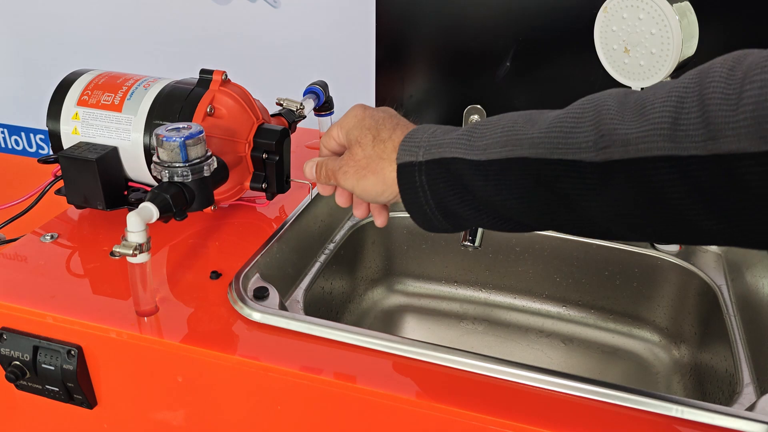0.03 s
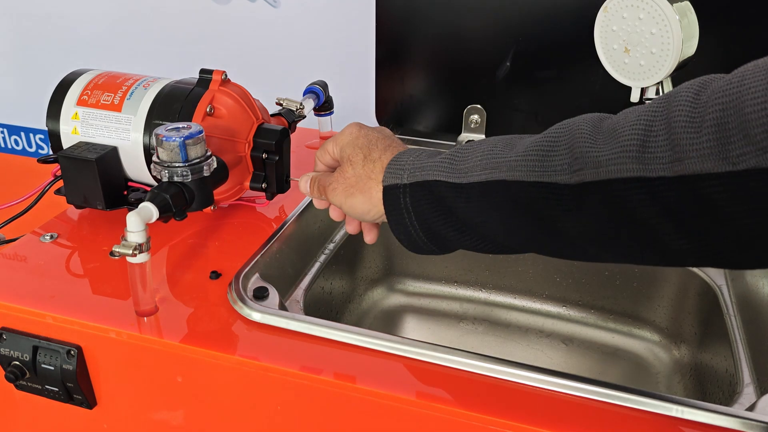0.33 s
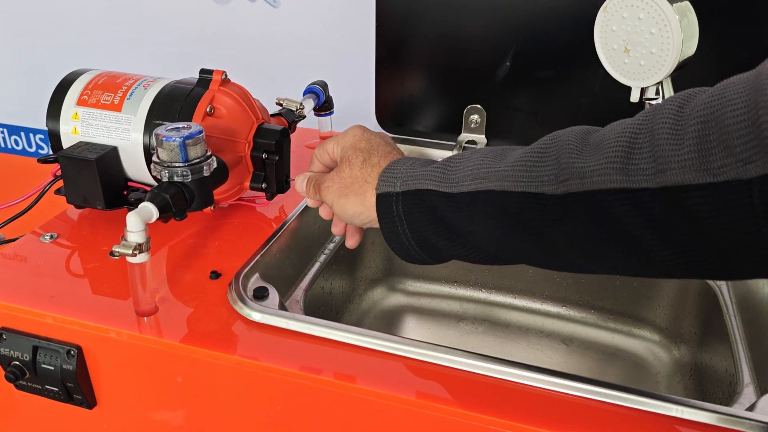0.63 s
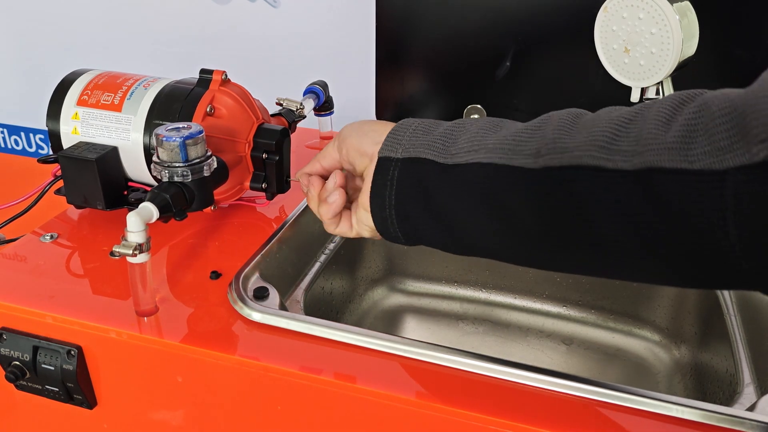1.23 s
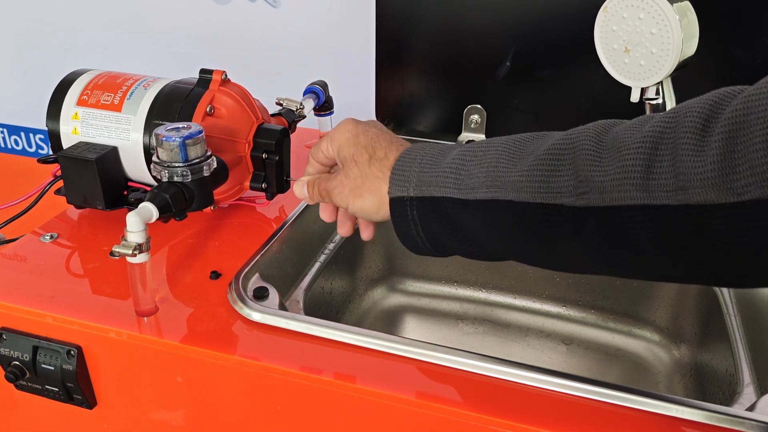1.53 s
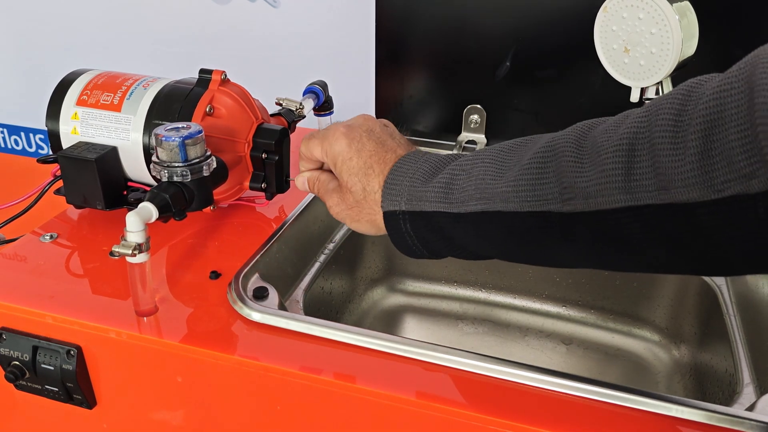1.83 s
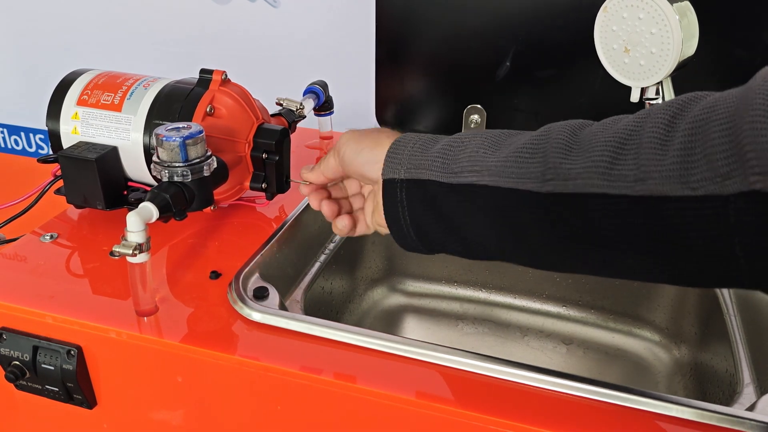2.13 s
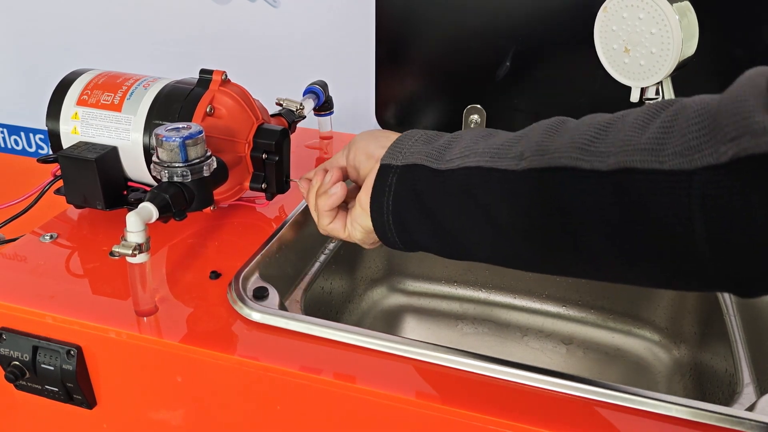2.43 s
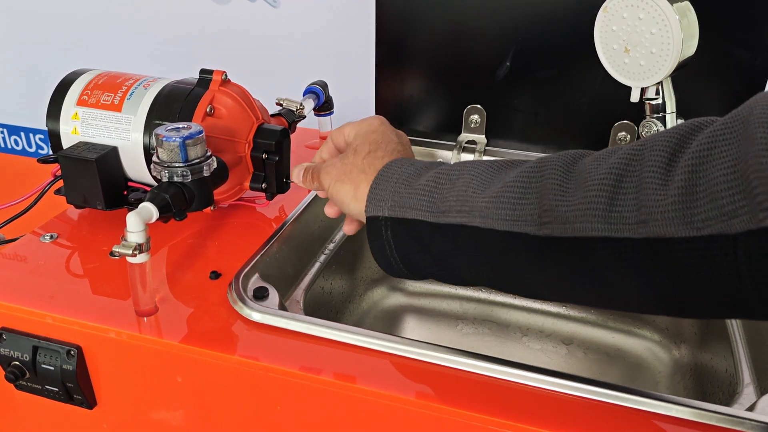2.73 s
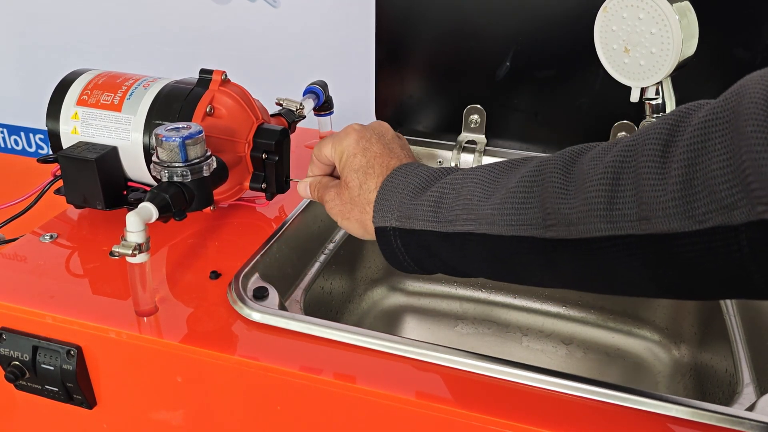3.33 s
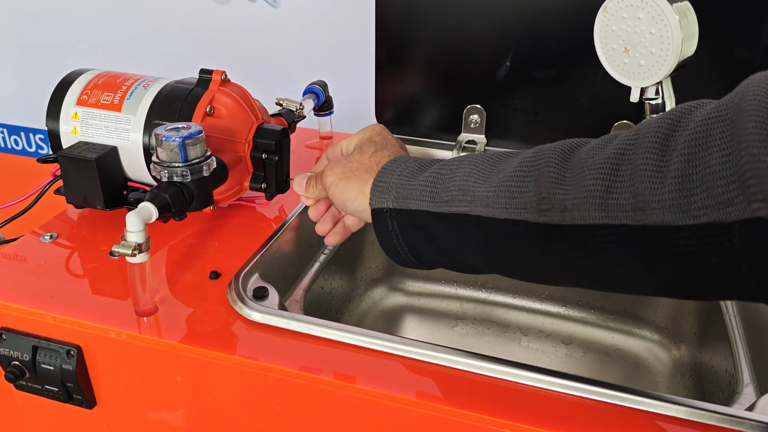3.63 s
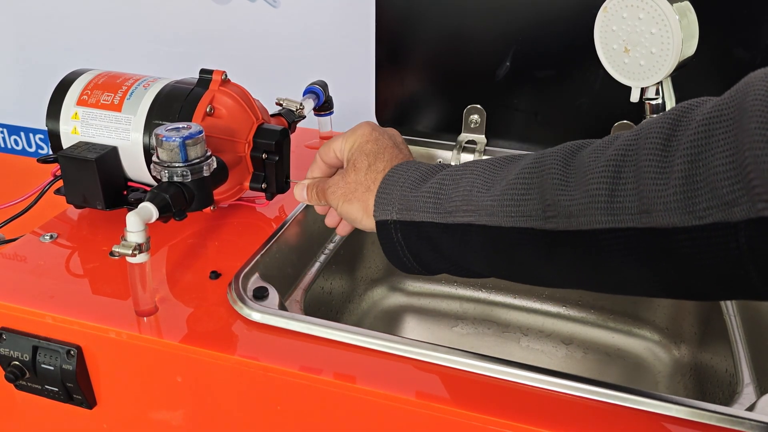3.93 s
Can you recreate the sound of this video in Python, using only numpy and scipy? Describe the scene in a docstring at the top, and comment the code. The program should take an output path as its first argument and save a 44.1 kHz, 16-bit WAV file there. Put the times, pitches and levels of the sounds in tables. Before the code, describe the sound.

An electric water pump drones close up beside a steel sink, with a throbbing whine, a rasp and hissing water. A few faint tool clicks sound, and past the middle the motor slows slightly and changes tone.

```python
"""An electric diaphragm pump drones on a counter beside a steel sink, heard close up in stereo.
Its cycle repeats every five motor turns: the housing hums, and a whine and a rasp throb once a cycle.
Water hisses in the fittings and makes two small blips, while the counter rumbles underneath.
A tool clicks on the adjusting screw. Past the middle the motor slows a little and the hum changes tone."""
import sys
import numpy as np
from scipy import signal
from scipy.fft import rfft, irfft
from scipy.io import wavfile
from scipy.ndimage import uniform_filter1d

SR = 44100
rng = np.random.default_rng(int(sys.argv[2]) if len(sys.argv) > 2 else 0)


def transcribe(u):
    """Save the signal u as a 16-bit wav file named by the first command-line argument.

    u: samples, shape (n,) or (channels, n), limited to [-1, 1]; the rate is SR.
    q: integer samples, one column per channel.
    """
    v = np.clip(np.atleast_2d(u).T, -1, 1)
    q = np.round(v * 32767).astype(np.int16)
    wavfile.write(sys.argv[1], SR, q)


N = 176400

# How fast the motor spins. Each row: time in seconds, turns per second.
MOTOR_SPEED = [(0.0, 72.38), (0.2, 72.88), (0.45, 72.55), (0.7, 72.73), (0.95, 72.64), (1.2, 73.43),
               (1.45, 72.82), (1.7, 72.93), (1.95, 72.73), (2.2, 72.87), (2.4, 71.46), (2.6, 70.66),
               (2.8, 69.69), (3.05, 69.97), (3.3, 69.52), (3.55, 69.81), (3.8, 68.95), (4.0, 69.0)]
# The motor's low tone. Each row: time in seconds, level in dB.
DRONE_LEVELS = [(0, -37.5), (1.2, -39.5), (1.4, -37.5), (2.55, -36.5), (2.85, -43), (3.7, -44), (4, -53)]
# Three changes of tone as the motor slows. Each row: start in seconds, end in seconds.
TONE_CHANGES = [(2.15, 2.35), (2.6, 2.85), (3.5, 3.75)]
# The housing's hum. Each row: vibrations per pump cycle, level in dB at full speed,
# then the level in dB after each of the three changes.
HUM_TONES = [(7, -67, -73, -59, -58), (8, -53, -66, -64, -71), (9, -55, -54, -61, -52),
             (11, -53, -59, -57, -53), (12, -50, -47, -49, -49), (13, -52, -46, -55, -52),
             (14, -60, -50, -49, -42), (15, -51, -47, -46, -48), (16, -49, -54, -58, -56),
             (17, -59, -62, -59, -72), (18, -57, -49, -50, -48), (19, -49, -48, -62, -56),
             (20, -47, -50, -49, -49), (21, -52, -55, -52, -51), (22, -56, -60, -53, -59),
             (23, -68, -66, -57, -57), (24, -51, -61, -70, -58), (25, -45, -45, -48, -53),
             (26, -55, -54, -52, -53), (27, -60, -50, -48, -48), (28, -56, -63, -57, -57),
             (29, -61, -57, -64, -74), (30, -64, -64, -64, -60), (31, -60, -59, -60, -61),
             (32, -62, -62, -62, -68), (33, -57, -61, -65, -66), (34, -62, -64, -70, -71),
             (35, -56, -53, -56, -63), (36, -63, -62, -61, -63), (37, -69, -59, -60, -57),
             (38, -61, -72, -62, -60), (43, -62, -69, -73, -65), (44, -58, -62, -58, -58),
             (45, -64, -56, -61, -70), (46, -54, -59, -53, -53), (47, -63, -61, -65, -63),
             (48, -61, -66, -65, -59), (49, -60, -59, -58, -56), (50, -63, -64, -64, -58),
             (51, -61, -59, -57, -59), (52, -68, -67, -65, -62), (60, -58, -62, -58, -58)]
# The motor's whine. Each row reads like a row of the hum.
WHINE_TONES = [(39, -52, -53, -54, -57), (40, -45.8, -54, -56, -52), (41, -47.5, -48, -47, -50),
               (42, -61, -61, -57, -59)]
# The pump head's rasp. Each row: pitch in Hz, width in Hz, level in dB, change in dB once slowed,
# place of the swell in the cycle from 0 to 1, swing in dB at full effort.
RASP_BANDS = [(880, 88, -55.5, -1, 0.23, 3.5), (1270, 310, -63, 2.5, 0.82, 11.5),
              (1820, 346, -56.5, -2.5, 0.64, 10), (2313, 170, -56, -3, 0.57, 8),
              (2686, 154, -52.5, -0.5, 0.8, 5.5)]
# The water's hiss. Each row: frequency in Hz, left and right strength in dB per Hz.
HISS_SPECTRUM = [(500, -100, -100), (1460, -82.5, -83.5), (2690, -78.5, -83), (3220, -68.5, -69.5),
                 (3470, -89, -71), (3790, -65.5, -70), (4320, -69, -73.5), (5230, -72, -74),
                 (6430, -76, -73), (7600, -80, -83.5), (8300, -81.5, -92), (10200, -75, -80),
                 (11280, -78.5, -102), (12100, -89, -86), (15100, -73.5, -78.5), (15400, -90, -87.5)]
# How the hiss rises and falls. Each row: time in seconds, dB added to it.
HISS_GAINS = [(0, -1.2), (.7, -0.5), (1.2, -0.96), (2.5, -1.8), (3.2, -1), (4, -2)]
# How alike the hiss is in both ears. Each row: frequency in Hz, likeness from 0 to 1.
HISS_LIKENESS = [(1400, 0.23), (3000, 0.79), (4800, 0.85), (6500, 0.15), (9000, 0.56), (15000, 0.4)]
# Where the fittings ring. Each row: pitch in Hz, width in Hz, gain in dB, left minus right in dB.
FITTING_BANDS = [(3020, 200, -10, 13.5), (4545, 320, 4.2, -5), (5090, 215, -1.8, -4.5), (6290, 440, -3, -7)]
# Those rings shift as the hand moves. Each row: time in seconds, then dB added to each ring in turn.
FITTING_GAINS = [(0, -58, -41, -57, -42), (0.22, -47, -47, -40.5, -48), (0.38, -51, -47, -44, -44.5),
                 (0.55, -64, -41.5, -54, -46), (0.8, -49, -38.5, -62, -44), (1.1, -68, -42.5, -59, -62),
                 (1.4, -76, -43, -50, -54), (1.65, -45, -41, -59, -47), (1.95, -42, -39.5, -43, -42),
                 (2.2, -48, -41, -47, -49), (2.45, -65, -43.5, -43, -56), (2.8, -62, -43, -43, -62),
                 (3.15, -40.5, -42.5, -39.5, -56), (3.4, -41.5, -42, -42.5, -49), (3.7, -46, -43, -42, -49),
                 (4, -42, -42.5, -42, -52)]
# The tool's clicks. Each row: start in seconds, gain in dB, left minus right in dB.
TOOL_CLICKS = [(.9754, -13.2, 5), (2.048, -21, 2), (3.5888, -16.3, 4), (3.5904, -23, 3)]
# The ring of tool and screw. Each row: pitch in Hz, relative level in dB, seconds to fade by 60 dB.
TOOL_RING = [(1550, -15.5, 0.0089), (2500, -16, 0.0088), (4500, -12, 0.016), (6620, -0.5, 0.0059),
             (7100, -1, 0.0044), (8450, -6.5, 0.0091), (9830, -6.5, 0.0048)]
# Small watery blips. Each row: start in seconds, pitch in Hz, level in dB.
WATER_BLIPS = [(1.605, 1050, -38), (3.325, 880, -35)]
# The rumble of motor and counter. Each row: frequency in Hz, strength in dB per Hz.
RUMBLE_SPECTRUM = [(15, -88), (55, -78.5), (75, -72.5), (95, -75.5), (120, -64), (150, -72.5), (200, -73),
                   (280, -71.5), (370, -75), (450, -77), (620, -79), (800, -77.5), (1100, -81.5),
                   (2000, -97)]

TURNS_PER_CYCLE = 5
DRONE_ORDER, WHINE_ORDER = 10, 40  # an order counts vibrations per pump cycle
SLOWING_MIDDLE_S, SLOWING_LENGTH_S = 2.6, 0.26
HUM_AT, HUM_SCATTER = 0.05026, 0.85  # where in the cycle the hum gathers, and how loosely (0 to 1)
HUM_WAVER_DB, HUM_SPREAD_HZ, PHASE_WAVER_RAD = 1.0, 1000, .09
WHINE_AT, WHINE_SLOW_AT = 0.65, 0.2  # where in the cycle the whine swells, before and after slowing
WHINE_BEND_RAD = 0.63  # keeps its tones a little out of step
HISS_FLICKER_DB, HISS_BAND_FLICKER_DB, FITTING_FLICKER_DB = 0.6, 1.7, 1.37
CRACK_DB, CRACK_FADE_S, CLICK_RISE_S = -24, 0.00071, .0002
BLIP_FADE_S, BLIP_RISE_S = 0.081, 0.0022
RUMBLE_SPREAD_HZ, RUMBLE_WAVER_DB = 670, 0.5
SHAKE_HZ, SHAKE_WIDTH_HZ, SHAKE_DB, SHAKE_SLOW_DB = 33, 28, -54.5, -61
RIGHT_DELAY_S, TREBLE_CUT_HZ = 0.00014, 15900


def motor_drone(cycle):
    """The motor makes a firm low tone that vibrates twice per turn."""
    level_db = curve(DRONE_LEVELS) + 0.46 * wander(6.5)
    return undb(level_db) * np.sin(2 * np.pi * DRONE_ORDER * (cycle - HUM_AT))


def housing_hum(cycle):
    """The housing hums at multiples of the cycle rate; higher tones differ more between the ears."""
    out = np.zeros((2, N))
    cycle_hz = cycle[-1] * SR / N
    for order, *levels_db in HUM_TONES:
        start = HUM_SCATTER * rng.uniform(-np.pi, np.pi)
        ear_shift = rng.choice([-1, 1]) * min(order * cycle_hz / HUM_SPREAD_HZ, 1) ** 2
        gain = undb(staged(levels_db) + HUM_WAVER_DB * wander(5.09))
        phase = 2 * np.pi * order * (cycle - HUM_AT) + start + PHASE_WAVER_RAD * wander(4.24)
        out += gain * np.sin(phase + np.array([[ear_shift], [-ear_shift]]))
    return out * pan(db=-1.9)


def motor_whine(cycle, slowed):
    """Close tones of the motor fall nearly into step once a cycle, so the whine swells."""
    swell_phase = 2 * np.pi * (cycle - WHINE_AT - (WHINE_SLOW_AT - WHINE_AT) * slowed)
    ear_shift = np.array([[.35], [-.35]])
    phase = 2 * np.pi * WHINE_ORDER * cycle + PHASE_WAVER_RAD * wander(7.7) + ear_shift
    out = 0
    for order, *levels_db in WHINE_TONES:
        step = order - WHINE_ORDER
        out += undb(staged(levels_db)) * np.sin(phase + step * swell_phase + WHINE_BEND_RAD * step ** 2)
    return out * pan(db=-2.5)


def pump_rasp(cycle, slowed):
    """The pump head rings with bands of noise, each swelling at its own place in the cycle."""
    effort = 0.8 + .22 * wander(14)  # no two cycles are alike
    out = 0
    for hz, width, db, change_db, at, swing_db in RASP_BANDS:
        throb_db = effort * swing_db * np.cos(2 * np.pi * (cycle - at))
        out += noise_band(hz, width, likeness=0.52) * undb(db + change_db * slowed + throb_db)
    return out


def water_hiss():
    """Water hisses through the pump; every band of the hiss flickers on its own."""
    colour = undb([by_hz(HISS_SPECTRUM, column=1), by_hz(HISS_SPECTRUM, column=2)])
    spectrum = stereo_spectra(by_hz(HISS_LIKENESS)) * colour
    band = np.minimum(np.fft.rfftfreq(N, 1 / SR) // 700, 23)  # 700 Hz each; the last takes the rest
    hiss = sum(irfft(spectrum * (band == k), N) * undb(HISS_BAND_FLICKER_DB * wander(90))
               for k in np.unique(band))
    return hiss * undb(curve(HISS_GAINS) + HISS_FLICKER_DB * wander(250))


def fittings():
    """Rushing water makes the fittings ring at a few high pitches."""
    gains = np.array(FITTING_GAINS, float)
    out = 0
    for column, (hz, width, db, pan_db) in enumerate(FITTING_BANDS, start=1):
        ring = noise_band(hz, width, likeness=0.83) * pan(pan_db)
        out += ring * undb(db + curve(gains[:, [0, column]]) + FITTING_FLICKER_DB * wander(39.78))
    return out


def tool_clicks():
    """The tool snaps against the screw: a tiny crack and a short metallic ring."""
    out = np.zeros((2, N))
    t = np.arange(SR // 20) / SR
    ring = sum(undb(db - 60 * t / fade_s) * np.sin(2 * np.pi * hz * t) for hz, db, fade_s in TOOL_RING)
    rise = 1 - np.exp(-t / CLICK_RISE_S)
    treble = signal.butter(4, [3500, 10500], "band", fs=SR, output="sos")
    for at, db, pan_db in TOOL_CLICKS:
        crack = signal.sosfilt(treble, rng.standard_normal((2, len(t))) * np.exp(-t / CRACK_FADE_S))
        i = int(at * SR)
        out[:, i:i + len(t)] += undb(db) * pan(pan_db) * (ring + undb(CRACK_DB) * crack) * rise
    return out


def water_blips():
    """Short bubble-like tones sound in the water and die away."""
    out = np.zeros(N)
    for at, hz, db in WATER_BLIPS:
        t = np.maximum(np.arange(N) / SR - at, 0)
        rise = 1 - np.exp(-t / BLIP_RISE_S)
        out += undb(db - 60 * t / BLIP_FADE_S) * rise * np.sin(2 * np.pi * hz * t)
    return out


def counter_rumble():
    """Motor and counter rumble unevenly; the lowest part is nearly the same in both ears."""
    colour = undb(by_hz(RUMBLE_SPECTRUM))
    spread = np.clip(np.fft.rfftfreq(N, 1 / SR) / RUMBLE_SPREAD_HZ, .33, .9) ** 2
    middle = irfft(white_spectrum() * colour, N)
    side = irfft(white_spectrum() * colour * spread, N)
    return (middle + side * np.array([[1], [-1]])) * undb(RUMBLE_WAVER_DB * wander(24.8))


def counter_shake(slowed):
    """The counter shakes deeply under the pump, less once the motor slows."""
    level_db = SHAKE_DB + (SHAKE_SLOW_DB - SHAKE_DB) * slowed
    return noise_band(SHAKE_HZ, SHAKE_WIDTH_HZ, likeness=0.91) * undb(level_db)


def undb(db):
    """Turn decibels into a number to multiply by."""
    return 10 ** (np.asarray(db) / 20)


def pan(db):
    """Left and right gains, with the left `db` decibels above the right."""
    return undb(np.array([[db], [-db]]) / 2)


def curve(table):
    """Join rows of time and value with straight lines."""
    return np.interp(np.arange(N) / SR, *np.array(table, float).T)


def staged(levels_db):
    """A level that holds still, then glides to the next at each change of tone."""
    return np.interp(np.arange(N) / SR, np.ravel(TONE_CHANGES), np.repeat(levels_db, 2)[1:-1])


def by_hz(table, column=1):
    """Fill in one column of a table for every frequency."""
    rows = np.array(table, float)
    return np.interp(np.log(np.fft.rfftfreq(N, 1 / SR) + 1), np.log(rows[:, 0]), rows[:, column])


def wander(rate):
    """A smooth random wobble of typical size 1, with `rate` new values a second."""
    hold = max(int(SR / rate), 2)
    steps = np.repeat(rng.standard_normal(N // hold + 1), hold)
    smooth = uniform_filter1d(uniform_filter1d(steps, hold), hold)[:N]
    return smooth / smooth.std()


def white_spectrum():
    """The spectrum of an even noise with a power of 1 per Hz."""
    return rfft(rng.standard_normal(N)) * np.sqrt(SR / 2)


def stereo_spectra(likeness):
    """Left and right noise spectra, partly alike; the sound reaches the left ear first."""
    left = white_spectrum()
    right = likeness * left + np.sqrt(1 - likeness ** 2) * white_spectrum()
    delay = np.exp(-2j * np.pi * np.fft.rfftfreq(N, 1 / SR) * RIGHT_DELAY_S)
    return np.array([left, right * delay])


def noise_band(hz, width_hz, likeness):
    """Stereo noise of typical size 1, kept to a steep-sided band around one pitch."""
    f = np.fft.rfftfreq(N, 1 / SR) + 1
    off_pitch = (f - hz ** 2 / f) / width_hz
    noise = irfft(stereo_spectra(likeness) / np.sqrt(1 + off_pitch ** 4), N)
    return noise / noise.std()


def scene():
    """The motor's speed drives the pump's sounds; the counter, water and tool join in."""
    cycle = np.cumsum(curve(MOTOR_SPEED)) / SR / TURNS_PER_CYCLE  # pump cycles done so far
    slowed = np.clip((np.arange(N) / SR - SLOWING_MIDDLE_S) / SLOWING_LENGTH_S + .5, 0, 1)
    pump = motor_drone(cycle) + housing_hum(cycle) + motor_whine(cycle, slowed) + pump_rasp(cycle, slowed)
    counter = counter_rumble() + counter_shake(slowed)
    return pump + counter + water_hiss() + fittings() + water_blips() + tool_clicks()


def record(dry):
    """A steep filter cuts off the highest treble."""
    return signal.sosfilt(signal.ellip(12, .1, 90, TREBLE_CUT_HZ, fs=SR, output="sos"), dry)


dry = scene()
out = record(dry)
transcribe(out)
```